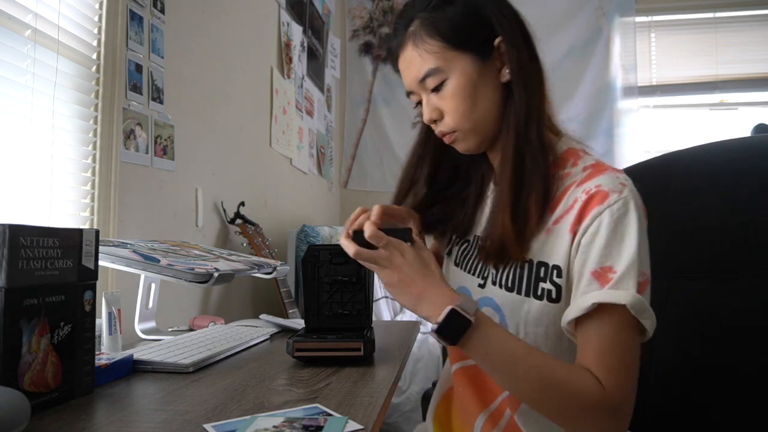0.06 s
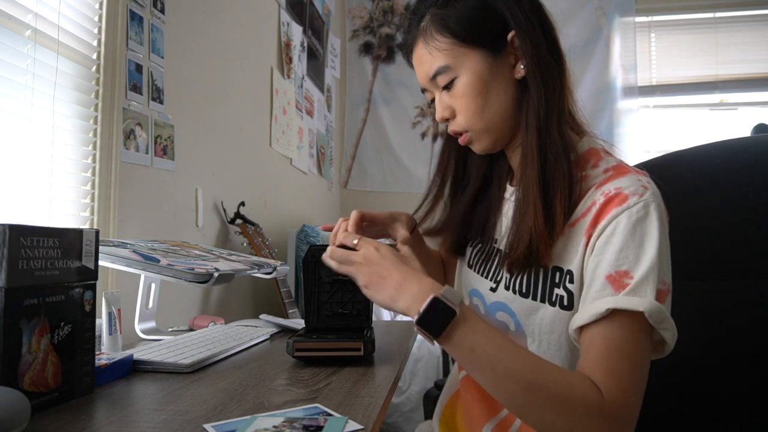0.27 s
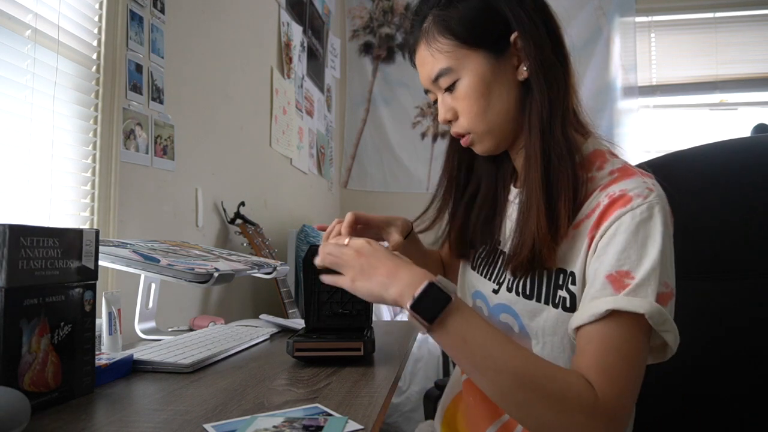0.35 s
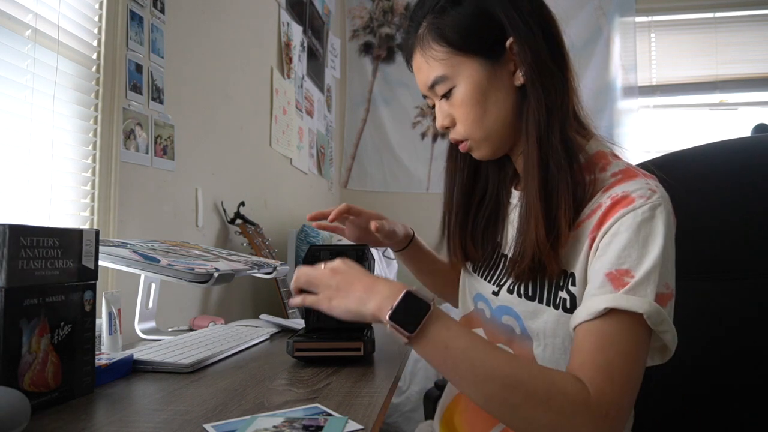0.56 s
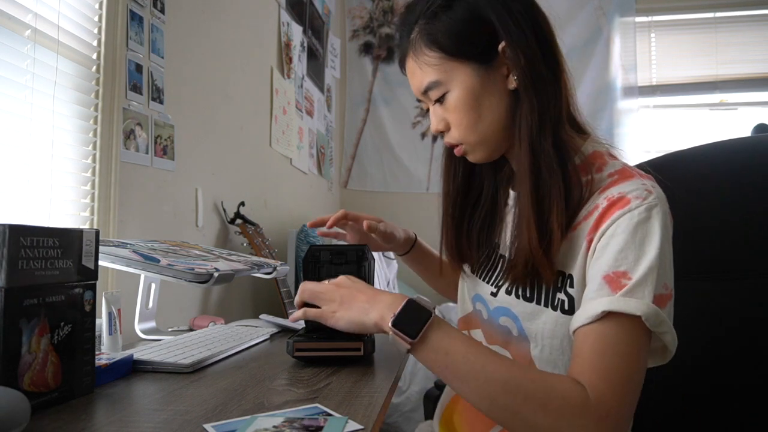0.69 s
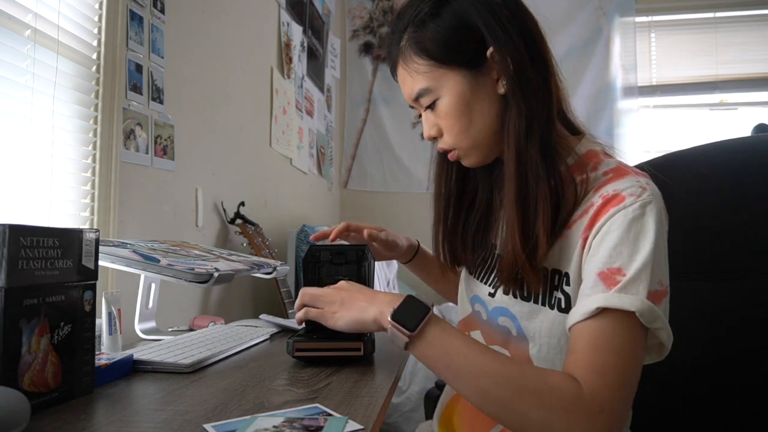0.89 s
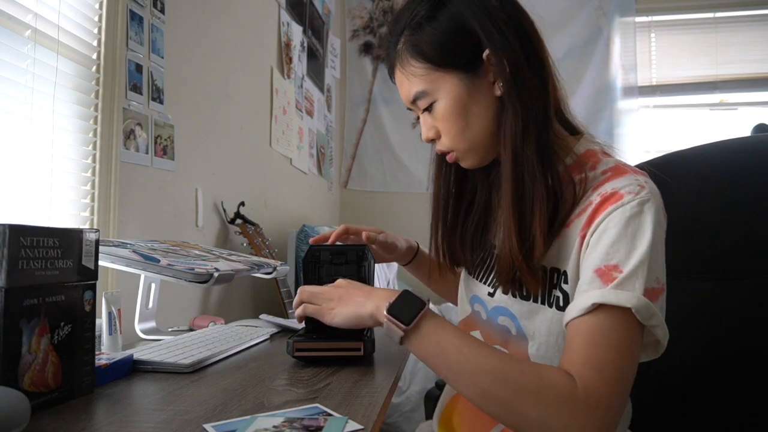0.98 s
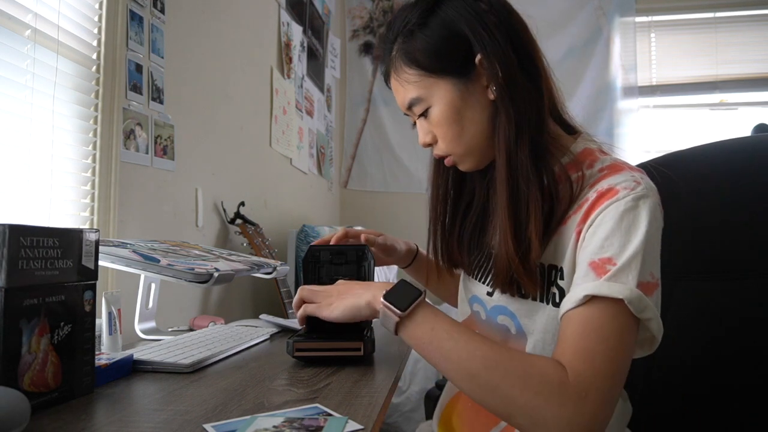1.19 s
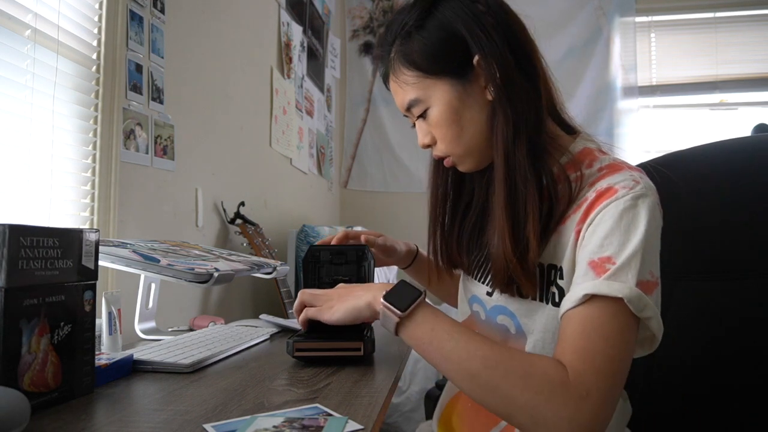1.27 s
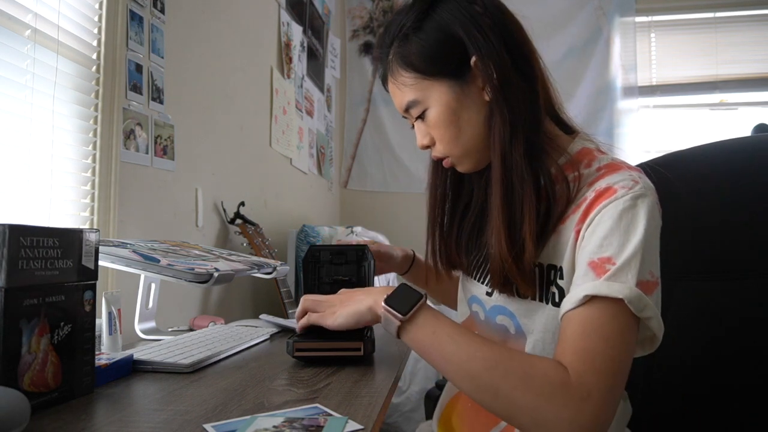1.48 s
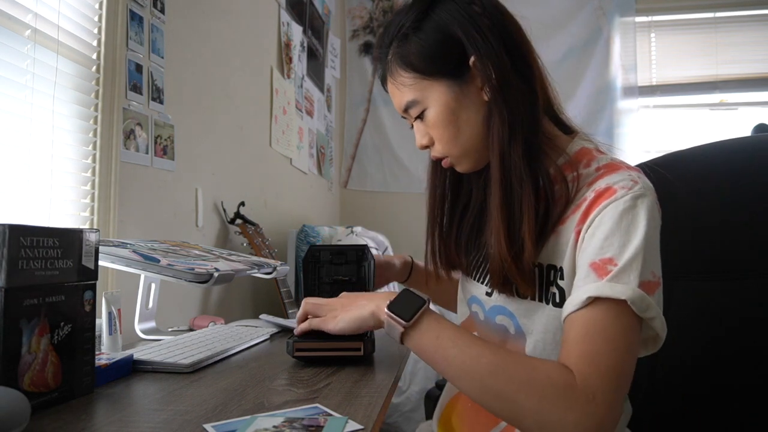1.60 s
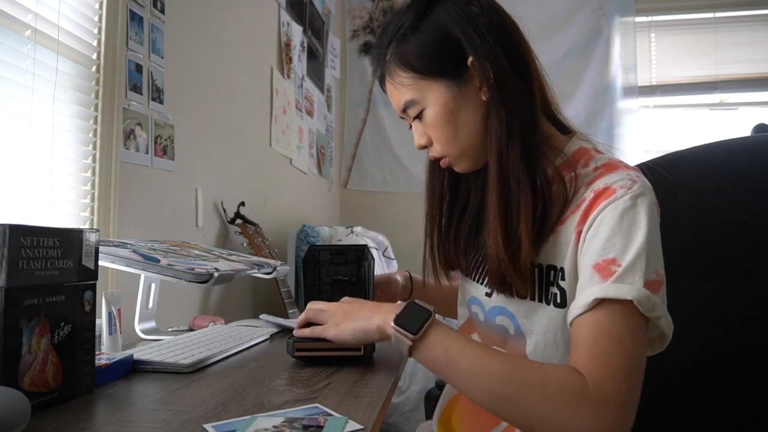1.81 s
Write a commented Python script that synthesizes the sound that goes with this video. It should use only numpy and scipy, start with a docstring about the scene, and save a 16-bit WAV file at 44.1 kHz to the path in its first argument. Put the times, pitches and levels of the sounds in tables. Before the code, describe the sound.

A sharp plastic snap, led by a short scrape and small ticks, comes from a device handled at a desk. After a pause, several keyboard keys knock unevenly, about a metre away in a quiet room with faint fan hum.

```python
"""At a desk in a small quiet room, a plastic part of a small device slides, catches and snaps home.
Friction makes the slide's noise; impacts set the part, the catch and the hollow case ringing.
Then a few keyboard keys are pressed and let go: short hollow knocks, the damped modes of keyboard
and desk. A small fan hums faintly over the room's hush. All is heard from about a metre away."""
import sys
import numpy as np
from scipy import signal
from scipy.fft import rfft, irfft, next_fast_len
from scipy.io import wavfile
from scipy.ndimage import uniform_filter1d

SR = 44100
rng = np.random.default_rng(int(sys.argv[2]) if len(sys.argv) > 2 else 0)


def generate_wav(signal):
    """Clip the signal to [-1, 1] and save it as 16-bit WAV at the path in sys.argv[1]."""
    frames = np.transpose(np.atleast_2d(signal))
    scaled = np.clip(frames, -1, 1) * 32767
    pcm = np.round(scaled).astype(np.int16)
    wavfile.write(sys.argv[1], SR, pcm)


N = 81585
T = np.arange(N) / SR
RING_T = T[:SR // 2]
SLIDER_PAN_DB = 3
# spectrum of plastic rubbing on plastic: frequency_hz, density_db
FRICTION_SPECTRUM = [(40, -29), (400, -3.5), (2000, 7), (3200, -2.5), (4600, 4.5), (5600, -0.5), (7400, 3),
                     (9000, -1.5), (12000, -0.5), (16000, -8)]


def amp(db):
    """Amplitude ratio of a level in decibels."""
    return 10 ** (np.asarray(db) / 20)


def unit(x):
    """Normalisation to unit energy."""
    return x / np.sqrt(np.sum(x ** 2))


def at_hz(points, hz):
    """Interpolation along log frequency."""
    frequencies, values = np.array(points, float).T
    return np.interp(np.log(np.maximum(hz, 1)), np.log(frequencies), values)


def colour(x, points):
    """Minimum-phase filter through points of frequency_hz, gain_db."""
    size = 2 * next_fast_len(len(x))
    gain = amp(at_hz(points, np.fft.rfftfreq(size, 1 / SR)))
    cepstrum = irfft(np.log(gain))
    cepstrum[1:size // 2] *= 2  # folding onto positive time makes the filter causal
    cepstrum[size // 2 + 1:] = 0
    return irfft(rfft(x, size) * np.exp(rfft(cepstrum)))[:len(x)]


def peak(x, hz, db):
    """Peaking filter: lifts or dips the octave around a frequency."""
    return colour(x, [(hz / np.sqrt(2), 0), (hz, db), (hz * np.sqrt(2), 0)])


def noise(spectrum):
    """Filtered Gaussian noise of rms 1."""
    x = colour(rng.standard_normal(N), spectrum)
    return x / x.std()


def wander(rate_hz):
    """Smoothed random fluctuation with a spread near 1."""
    hold = int(SR / rate_hz)
    return uniform_filter1d(np.repeat(rng.standard_normal(N // hold + 1), hold), hold)[:N]


def fade(t60_s):
    """Exponential decay, 60 dB in the given time."""
    return np.exp(-np.log(1000) * RING_T / t60_s)


def ring(modes, group=1):
    """Free vibration as a sum of damped modes; the sign alternates every `group` modes."""
    return unit(sum((-1) ** (k // group) * amp(db) * unit(np.sin(2 * np.pi * hz * RING_T) * fade(t60_s))
                    for k, (hz, db, t60_s) in enumerate(modes)))


def crack(decay_s, spectrum):
    """A brief contact radiates a broadband burst of noise."""
    return unit(colour(rng.standard_normal(len(RING_T)) * np.exp(-RING_T / decay_s), spectrum))


def pan(db):
    """Stereo gains for a level difference, left minus right."""
    return amp(np.array([[db], [-db]]) / 2)


def add(out, start_s, x):
    """Superposition of a stereo sound from a given time."""
    i = int(max(start_s, 0) * SR)
    out[:, i:i + x.shape[1]] += x[:, :N - i]


def reflections(early_db, late_db):
    """Impulse response: early echoes off desk and walls, then reverberation, shorter in the treble."""
    # reverberation time: frequency_hz, t60_s
    decay_times = [(200, 0.37), (600, 0.34), (1400, 0.31), (2800, 0.31), (4500, .24), (9000, 0.2),
                   (15000, 0.15)]
    # side relative to mid in the reflections: frequency_hz, gain_db
    side_gain = [(100, -13), (300, -28), (1000, -10), (4000, -2), (12000, 1.5)]
    hz = np.fft.rfftfreq(len(RING_T), 1 / SR)
    onset = lambda delay_s: np.clip(RING_T / delay_s - 1, 0, 1)
    responses = []
    for _ in range(2):
        early, late = rng.standard_normal((2, len(RING_T)))
        early = unit(early * fade(t60_s=0.077) * onset(delay_s=0.002))
        tail = 0
        for centre_hz, t60_s in decay_times:
            band = at_hz([(f, f == centre_hz) for f, _ in decay_times], hz)
            tail += irfft(rfft(late) * band, len(late)) * fade(t60_s)
        responses.append(amp(early_db) * early + amp(late_db) * unit(tail * onset(delay_s=0.0079)))
    mid, side = responses
    return mid + np.array([[1], [-1]]) * colour(side, side_gain)


def in_room(x, pan_db, early_db, late_db):
    """Direct sound plus its convolution with the room, panned half as far."""
    reflected = signal.fftconvolve(x[None], reflections(early_db, late_db), axes=1)[:, :len(x)]
    return pan(pan_db) * x + pan(pan_db / 2) * reflected


def hush():
    """Stationary room noise; left and right are most coherent in the bass."""
    # background noise: frequency_hz, density_db
    spectrum = [(25, -22), (60, -14), (105, -16), (150, -4), (200, -2), (400, 0), (600, 1.5), (900, 0.5),
                (1400, -0.5), (2500, -3), (6000, -6.5), (15500, -10.5)]
    side = 0.75 * colour(noise(spectrum), [(150, -9), (500, 5.5), (3000, 3.0), (10000, 0.5)])
    return amp(-63.5) * (noise(spectrum) + np.array([[1], [-1]]) * side)


def fan():
    """Rotation gives harmonics of the shaft rate; air noise excites two resonances of the housing."""
    # tones of the hum: shaft_multiple, level_db
    harmonics = [(1, -91.5), (3, -69.5), (4, -78)]
    # slow wavering of the hum: time_s, gain_db
    waver = [(0, -2.5), (.12, 3), (.52, -4.5), (.74, 2), (1.09, -11.5), (1.4, -21), (1.62, -6.5),
             (1.85, 4.5)]
    # air in the housing: centre_hz, width_hz, rms_db
    resonances = [(580, 31.4, -72.5), (673, 66, -71.5)]
    shaft_hz, wobble = 80.47, 0.0041
    angle = 2 * np.pi * np.cumsum(shaft_hz * (1 + wobble * wander(22.0))) / SR
    hum = sum(np.sqrt(2) * amp(db) * np.sin(multiple * angle) for multiple, db in harmonics)
    hum *= amp(np.interp(T, *np.array(waver).T))
    hz = np.fft.rfftfreq(2 * N, 1 / SR)
    for centre_hz, width_hz, rms_db in resonances:
        air = irfft(rfft(rng.standard_normal(2 * N)) / (1 + ((hz - centre_hz) / width_hz) ** 2))[:N]
        hum += amp(rms_db) * air / air.std()
    return hum


def slide():
    """Sliding friction: plastic rubs louder up to its stop, and the fingers rustle on a little longer."""
    stop_s, let_go_s, release_s = 0.046, 0.5, 0.0023
    rise_db_per_s, roughness = 82, 0.23
    push = amp(-58 + rise_db_per_s * np.minimum(T - stop_s, 0))
    push *= np.exp(-np.maximum(T - stop_s, 0) / release_s)
    grip = amp(-67.5 + 2 * wander(31.7)) * np.clip((let_go_s - T) / release_s, 0, 1)
    rub = colour(rng.standard_normal(N) * np.exp(roughness * wander(1500)), FRICTION_SPECTRUM)
    return in_room(rub / rub.std() * (push + grip), SLIDER_PAN_DB, early_db=-4.5, late_db=-11.5)


def case_bumps():
    """Resonance: each soft impact of a finger excites one damped mode of the hollow case."""
    # finger impacts: start_s, level_db, pitch_hz, t60_s
    bumps = [(0.0219, -24.5, 975, 0.028), (.053, -35, 950, 0.026), (0.1833, -27, 1312, 0.065),
             (.186, -34, 594, 0.24), (.273, -34.5, 1004, 0.049), (0.307, -37, 214, 0.23)]
    out = np.zeros((2, N))
    for start_s, level_db, pitch_hz, t60_s in bumps:
        note = colour(ring([(pitch_hz, 0, t60_s)]), [(pitch_hz / 10, -24), (pitch_hz / 2, 0)])
        add(out, start_s, amp(level_db) * in_room(note, pan_db=3, early_db=2, late_db=-9.5))
    return out


def slider_ticks():
    """Impulse excitation: the sliding part ticks over its guide and rings in heavily damped modes."""
    # impacts on the guide: start_s, level_db
    impacts = [(0.0399, -29.5), (0.1813, -36), (0.1839, -21), (0.1911, -30.5)]
    # modes of the sliding part: frequency_hz, level_db, t60_s
    modes = [(2130, -18, 0.032), (2450, -7, 0.0054), (4690, 5.5, 0.01), (5480, -9, 0.011), (6600, 3, 0.019),
             (6730, -10, 0.016), (8390, -3, .016), (12050, -13, 0.017)]
    out = np.zeros((2, N))
    for start_s, level_db in impacts:
        blow = ring(modes) + amp(-2) * crack(0.0027, FRICTION_SPECTRUM)
        add(out, start_s, amp(level_db) * in_room(blow, SLIDER_PAN_DB, early_db=-5.5, late_db=-8))
    return out


def catch():
    """A rapid train of impacts drives the catch's modes; its crack reverberates more than its ring."""
    # blows as the catch snaps home: start_s, level_db, treble_db, body_db
    snaps = [(0.2396, -11.5, -2.5, -1), (0.2437, -6, -6, -13), (0.245, -7, 1.5, -7.5),
             (0.2477, -7.5, -1.5, -14), (0.255, -10.5, -0.5, 0), (0.261, -24.5, -1.5, 5),
             (.267, -29.5, 0, 13.5)]
    # modes of the catch: frequency_hz, level_db, t60_s
    modes = [(4370, -4, .028), (4737, 1, .028), (14727, -4, .02), (2400, -20, .015), (4650, -6, .008),
             (5110, -8, .02), (7650, -9, .006), (11150, -13, .008), (11950, -12, .01), (14150, -11, .008),
             (15400, -11, .006)]
    # contact noise: frequency_hz, density_db
    spectrum = [(200, 2), (1000, -6), (2700, -2), (3600, 2), (4600, 7), (6200, -7.5), (7600, -2),
                (9500, -4.5), (12000, -1), (16000, -8)]
    case_hz = 2440
    out = np.zeros((2, N))
    for start_s, level_db, treble_db, body_db in snaps:
        timbre = [(50, -30), (case_hz / 2, body_db), (2 * case_hz, 0), (12000, treble_db)]
        note = in_room(colour(ring(modes), timbre), pan_db=0, early_db=-10.5, late_db=-24)
        burst = in_room(colour(crack(0.007, spectrum), timbre), pan_db=0, early_db=-9, late_db=-8)
        add(out, start_s, amp(level_db) * (note + amp(-5) * burst))
    return out


def device():
    """The device's sounds superpose; a level difference puts the mechanism's treble to the left."""
    # stereo balance of the mechanism: frequency_hz, left_minus_right_db
    balance = [(1000, -3.5), (4500, 2), (8000, 3), (14000, 7.5)]
    left, right = slide() + slider_ticks() + catch()
    left = colour(left, [(hz, db / 2) for hz, db in balance])
    right = colour(right, [(hz, -db / 2) for hz, db in balance])
    return case_bumps() + np.array([left, right])


def keys():
    """Each key's impact radiates a dry tick and excites the modes of its cap, the keyboard and desk."""
    # presses and releases: start_s, level_db, tilt_db_per_octave, mid_db, tick_db, tick_hz,
    # cap_hz, cap_db, pan_db
    strokes = [(.9170, -22, 0, 2.5, -8, 9300, 2680, -12, 2.5),
               (1.159, -16.5, 0, -11, -5.5, 7300, 1750, -7, 5),
               (1.192, -15.5, 1, -1, -6, 3660, 1093, -1.5, 3.5),
               (1.2003, -19.5, -0.5, -18, -20, 4000, 2450, 4, 2),
               (1.2460, -16.5, 1, -8, -8.5, 3330, 1292, 2, 3.5),
               (1.3264, -29, -0.5, -3, -22, 4200, 1750, -9, -3),
               (1.3599, -30.5, -1, -10, -14, 4200, 1314, -2, 1),
               (1.4765, -24.5, -2.5, -0.5, -10, 7000, 4200, -5.5, 3.5),
               (1.487, -17, 1, 0, -8, 4050, 1590, -10.5, 2.5),
               (1.5365, -7.5, -0.44, 2, -16.5, 6700, 620, -25.5, 4),
               (1.5656, -31.5, 5.5, -15, 2.5, 3800, 3600, 0, 1),
               (1.7098, -27.5, 0, 1.5, -10, 4500, 1110, -4, 3)]
    # modes of keyboard and desk: frequency_hz, level_db, t60_s
    modes = [(320, -17, 0.12), (500, -5.5, 0.014), (648.6, -3, 0.08), (708.4, -2.5, 0.049),
             (925, -6, 0.077), (1030, 1, 0.038), (1247, 2, 0.0087), (1472, -3, 0.0072), (1668, -1, 0.013),
             (1844, -1.5, 0.011), (2154, -0.5, 0.017), (2390, -8.5, 0.024), (3260, -4.5, 0.003),
             (4190, -9, 0.0024)]
    # contact noise: frequency_hz, density_db
    spectrum = [(40, -52), (700, -20), (2000, 3), (4000, 7.5), (5800, -3), (11000, -3), (16000, -8.5)]
    cap_t60_s = 0.018
    out = np.zeros((2, N))
    for start_s, level_db, tilt, mid_db, tick_db, tick_hz, cap_hz, cap_db, pan_db in strokes:
        board = ring([(hz, db + tilt * np.log2(hz), t60_s) for hz, db, t60_s in modes], group=2)
        cap = amp(cap_db) * ring([(cap_hz, 0, cap_t60_s)])
        knock = colour(peak(board, hz=1750, db=mid_db) + cap, [(70, -32), (350, -6.5), (600, -0.5)])
        tick = unit(peak(crack(0.0015, spectrum), tick_hz, db=10))
        add(out, start_s, amp(level_db) * in_room(knock, pan_db, early_db=0, late_db=-6))
        add(out, start_s, amp(level_db + tick_db) * in_room(tick, pan_db, early_db=-4.5, late_db=-8.5))
    return out


def scene():
    """Superposition: the pressures of device, keys, fan and room noise add."""
    return device() + keys() + fan() + hush()


def record(dry):
    """An elliptic low-pass filter removes the highest treble."""
    cutoff_hz = 15900
    return signal.sosfilt(signal.ellip(10, .2, 70, cutoff_hz, fs=SR, output="sos"), dry)


dry = scene()
out = record(dry)
generate_wav(out)
```